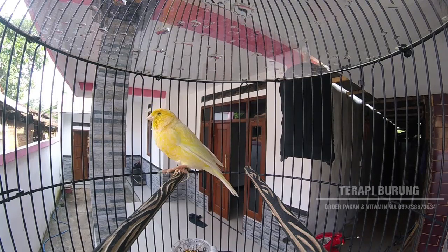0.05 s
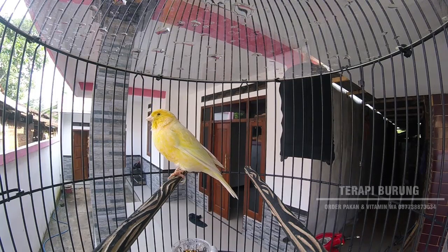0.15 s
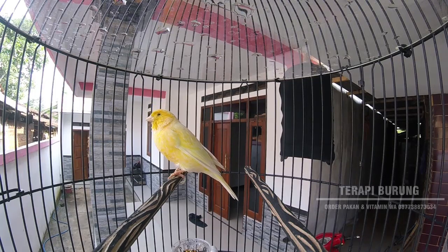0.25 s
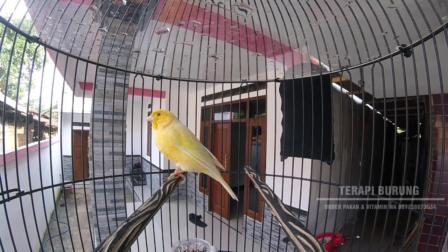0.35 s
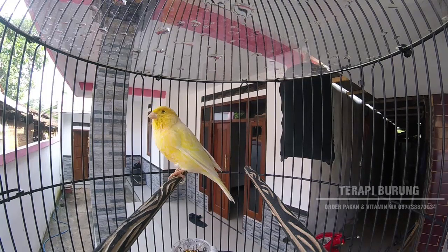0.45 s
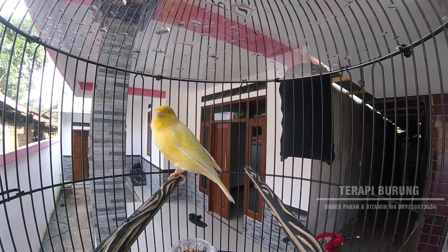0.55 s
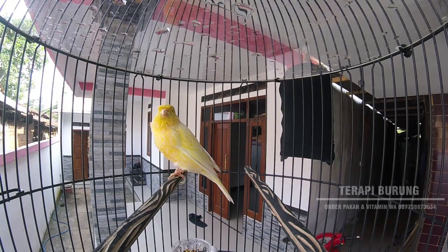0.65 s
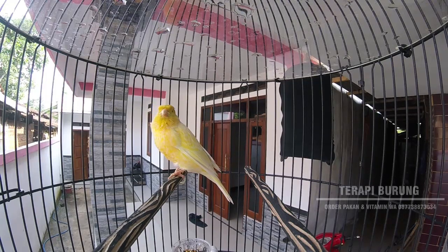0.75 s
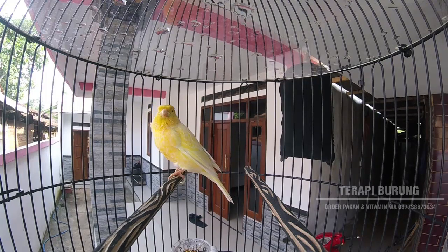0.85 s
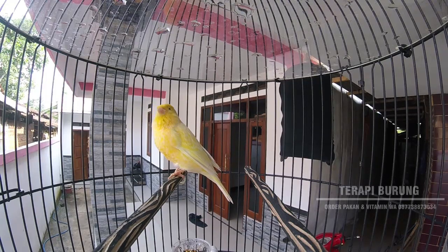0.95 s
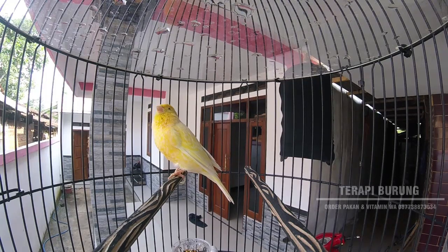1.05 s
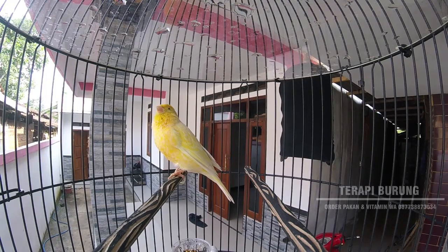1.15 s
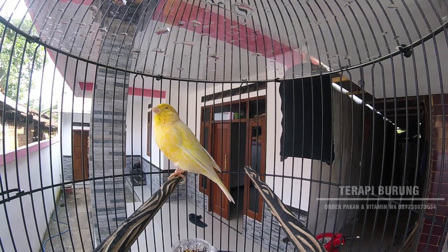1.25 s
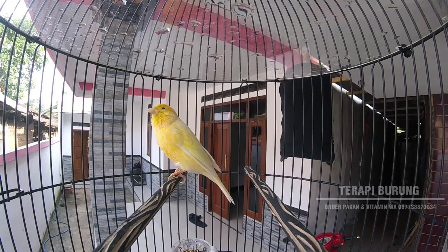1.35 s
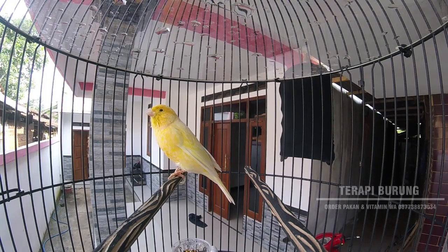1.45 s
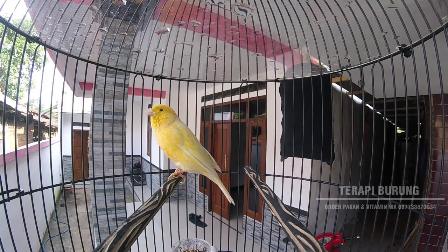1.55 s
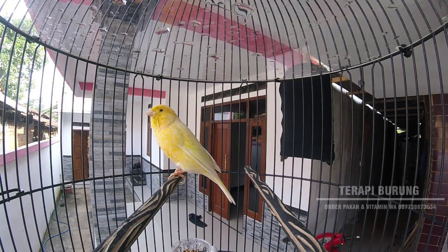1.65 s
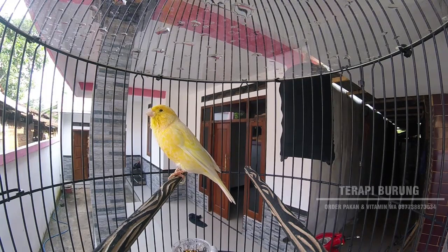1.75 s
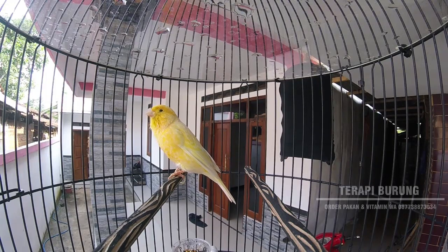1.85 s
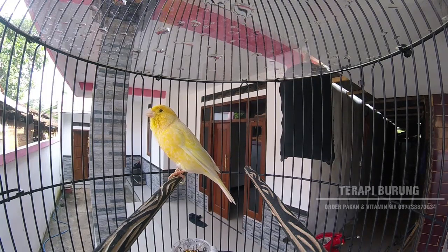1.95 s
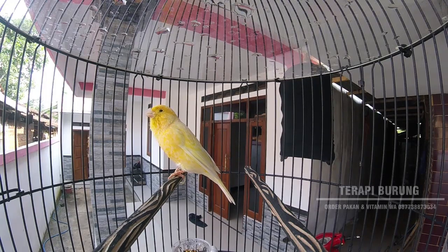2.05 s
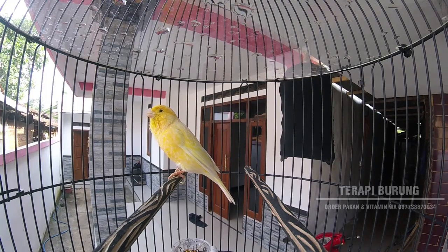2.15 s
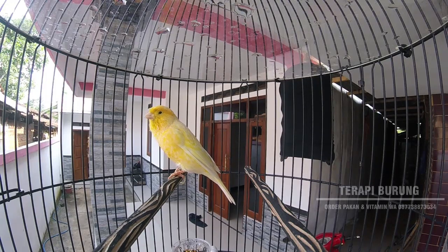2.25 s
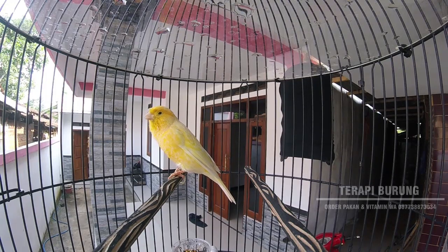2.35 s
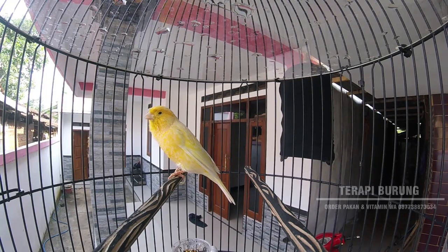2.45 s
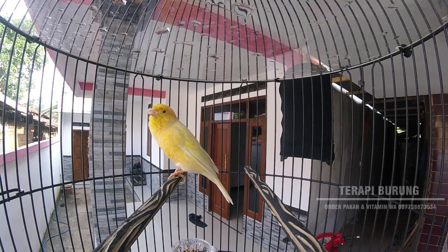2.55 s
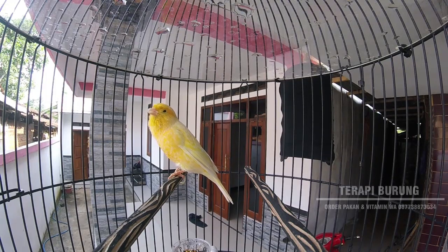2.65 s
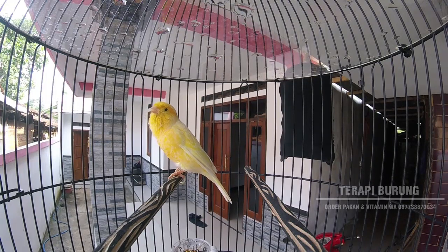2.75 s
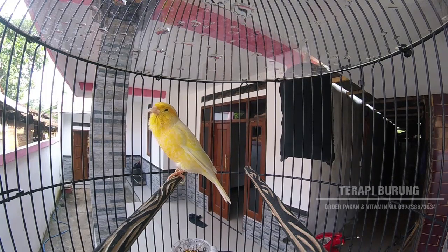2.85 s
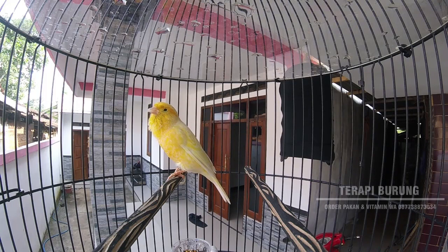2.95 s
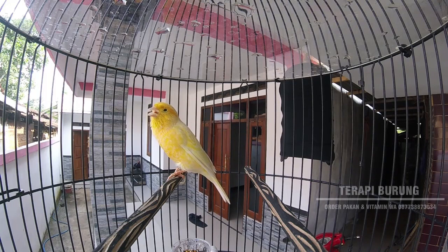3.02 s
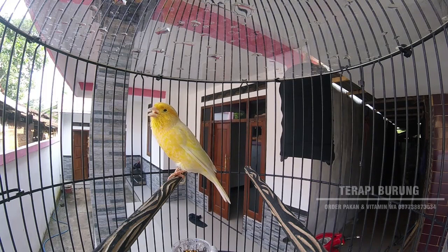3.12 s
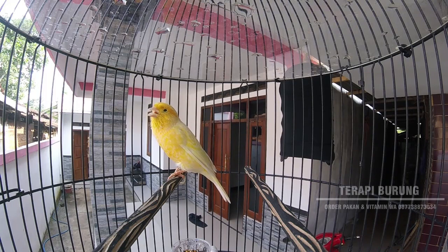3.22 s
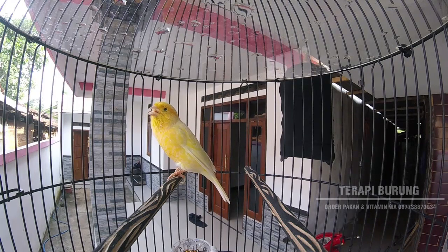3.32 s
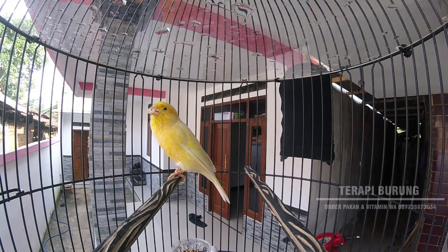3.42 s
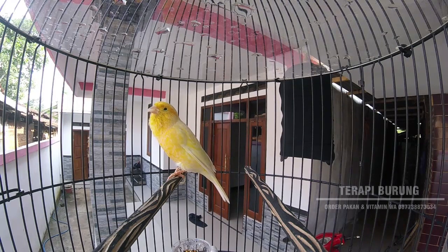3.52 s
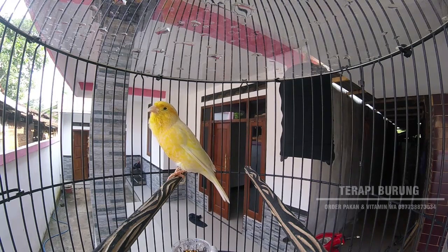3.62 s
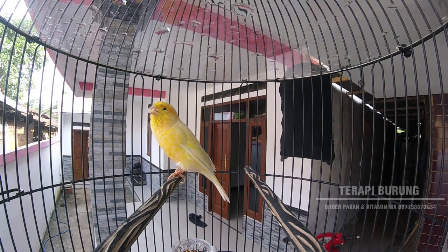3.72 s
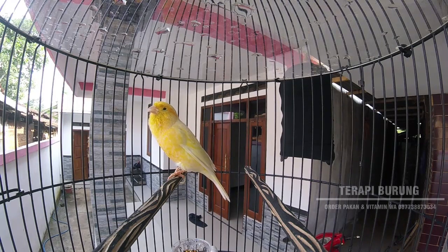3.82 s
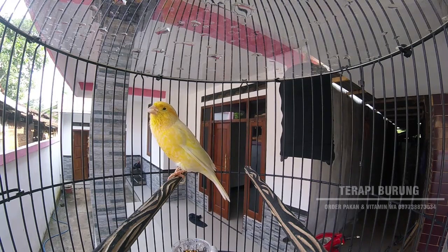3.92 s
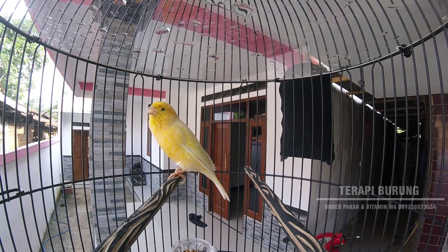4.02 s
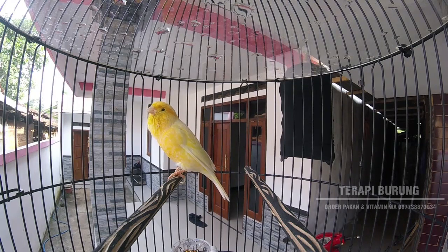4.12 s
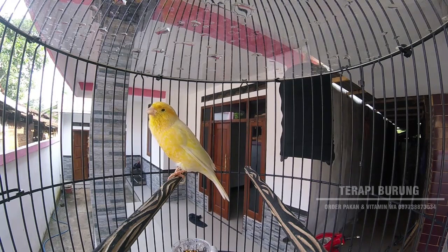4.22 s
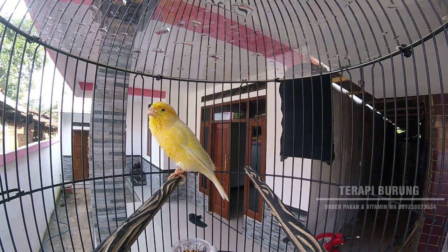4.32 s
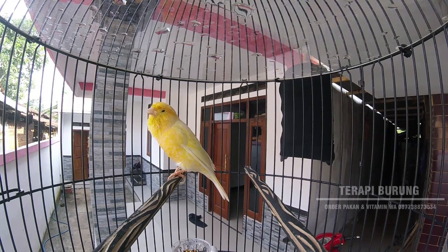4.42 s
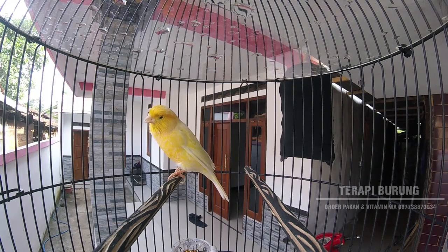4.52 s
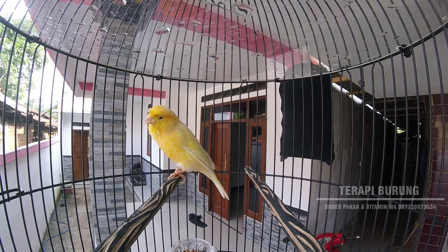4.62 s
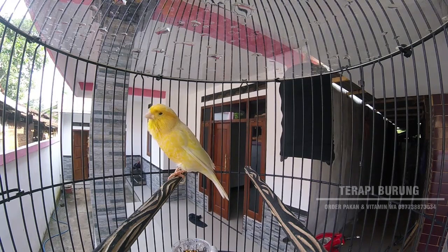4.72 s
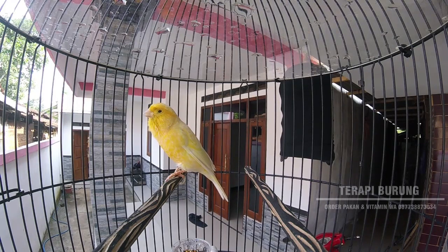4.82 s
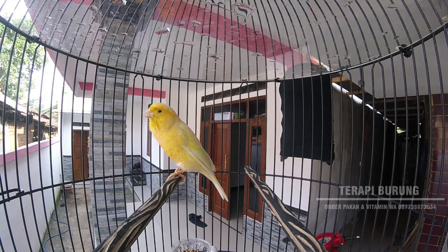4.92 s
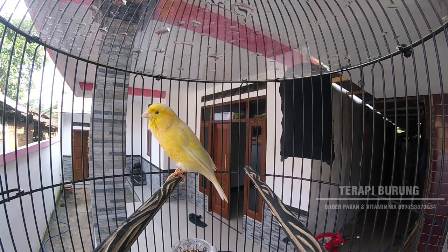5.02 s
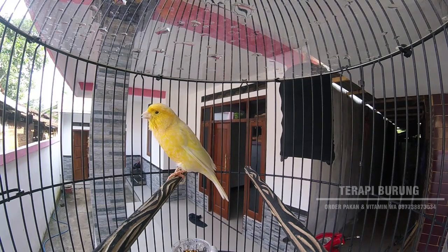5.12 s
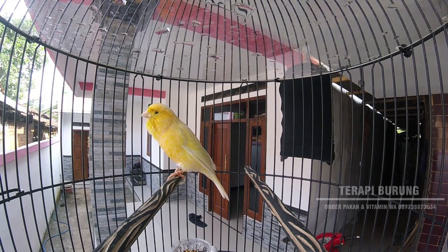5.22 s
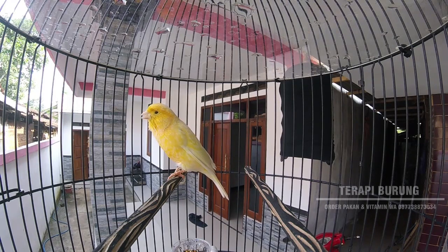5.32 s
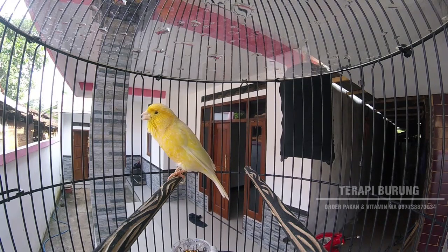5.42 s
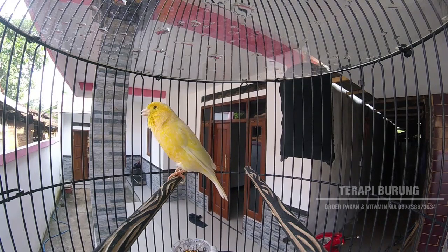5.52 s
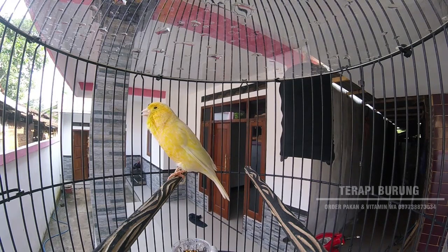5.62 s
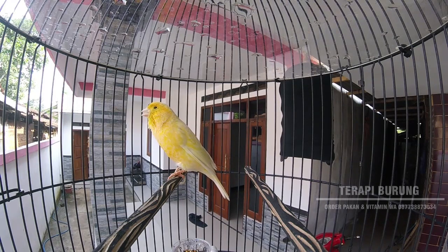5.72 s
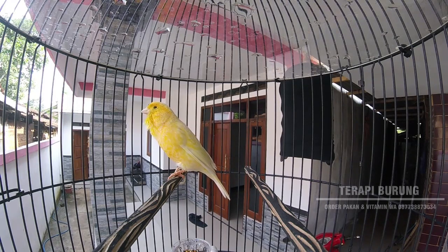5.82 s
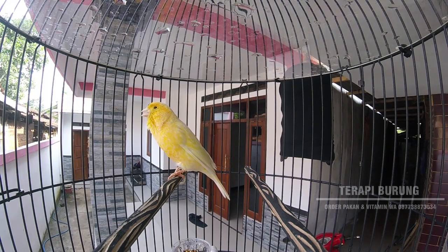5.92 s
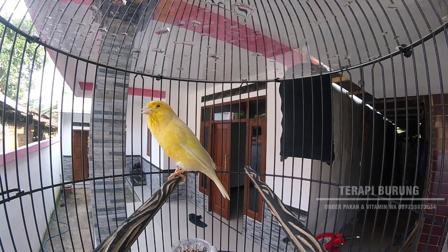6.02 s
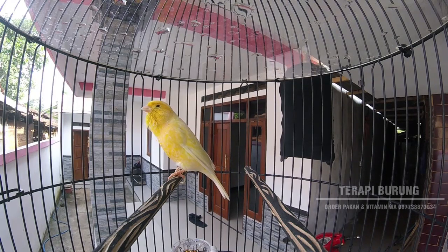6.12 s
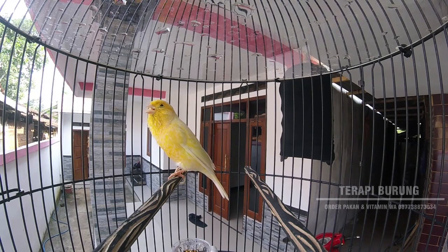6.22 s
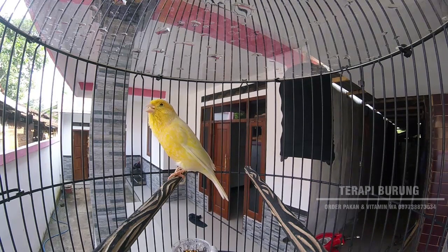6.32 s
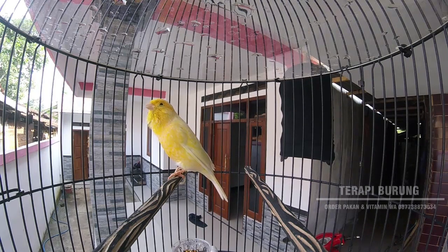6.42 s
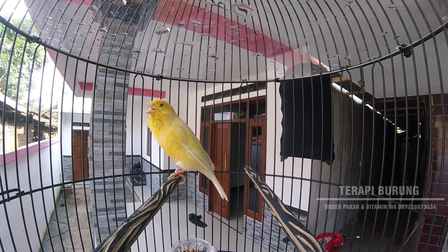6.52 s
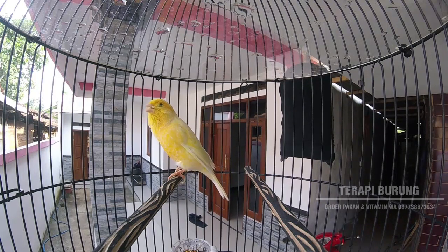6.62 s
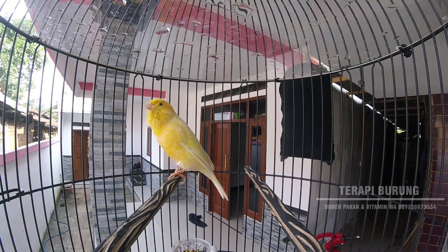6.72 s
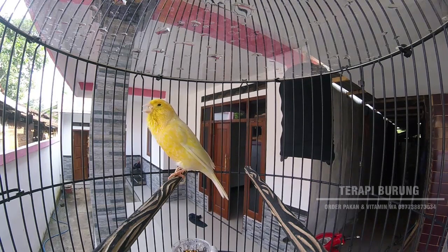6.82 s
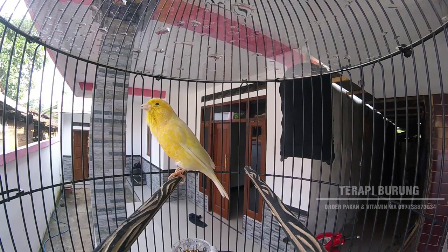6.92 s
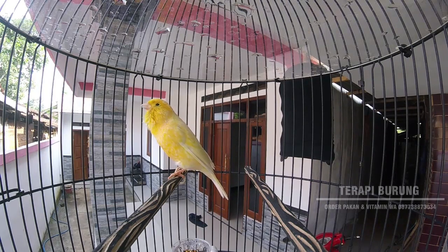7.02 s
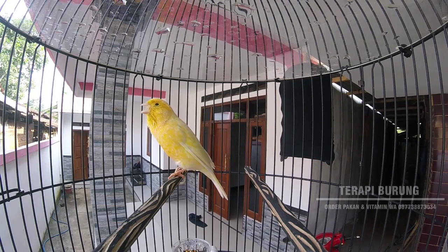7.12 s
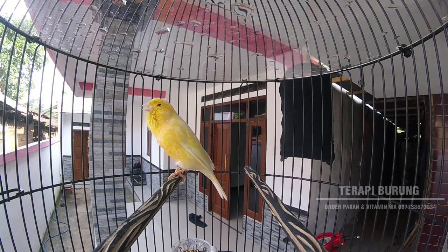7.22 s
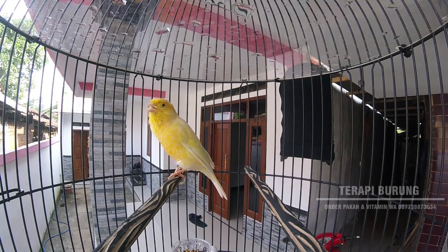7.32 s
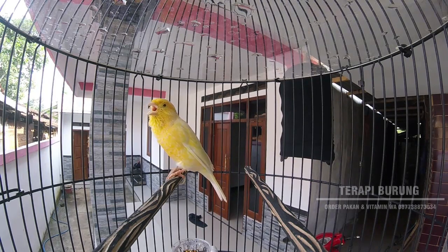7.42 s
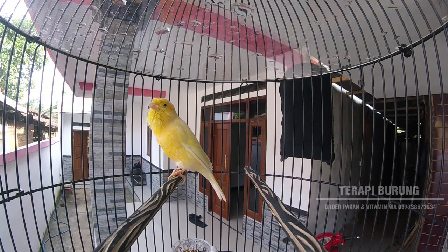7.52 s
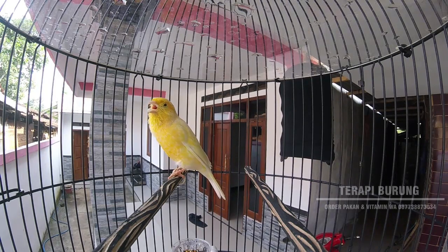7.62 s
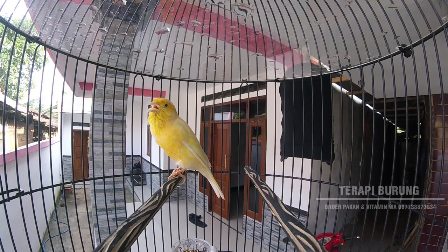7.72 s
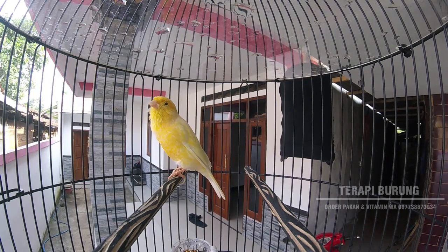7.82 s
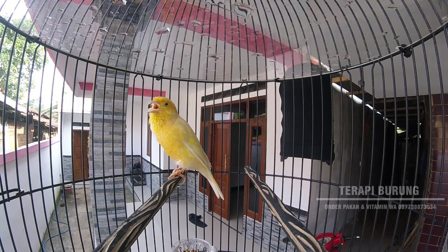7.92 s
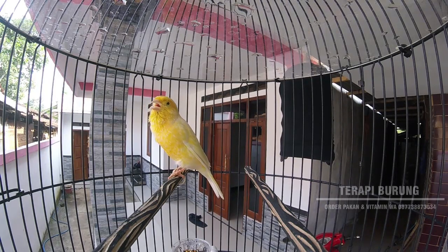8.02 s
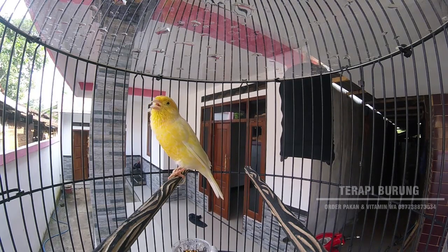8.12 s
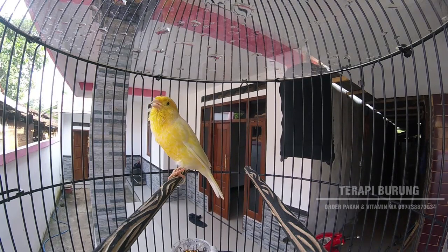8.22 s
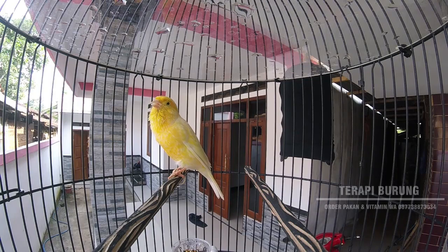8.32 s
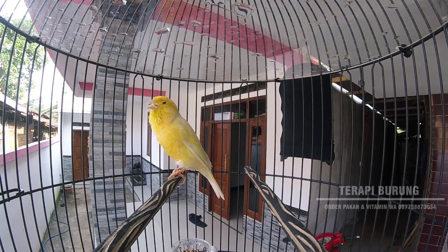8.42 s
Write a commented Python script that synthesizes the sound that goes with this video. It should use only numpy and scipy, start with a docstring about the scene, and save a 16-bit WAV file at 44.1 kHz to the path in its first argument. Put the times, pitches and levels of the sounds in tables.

```python
"""Something heavy trundles briefly in a house amid thuds; insects hiss over a low rumble throughout.
A hoarse bird rasps farther off, then a canary in a wire cage on the porch sings rising glides, then falling
trills that grow loud; thuds return before the final held note. Each whistle is a gliding sine with overtones,
coloured by close reflections and porch echoes; thuds are decaying resonances, the rest shaped noise and a tone."""
import sys
import numpy as np
from scipy import signal
from scipy.fft import rfft, irfft, next_fast_len
from scipy.io import wavfile
from scipy.ndimage import uniform_filter1d

SR = 44100
rng = np.random.default_rng(int(sys.argv[2]) if len(sys.argv) > 2 else 0)


def generate_wav(sig):
    """Save sig (samples, or channels by samples) to the path in sys.argv[1] as 16-bit PCM at SR."""
    pcm = np.round(np.clip(np.atleast_2d(sig).T, -1, 1) * 32767).astype(np.int16)
    wavfile.write(sys.argv[1], SR, pcm)


N = 373086
TIME_S = np.arange(N) / SR

# Trill syllables. Each row: start in seconds, end in seconds, level in dB before the gesture shapes it.
RISE_SYLLABLES = [(1.286, 1.347, -41.5), (1.408, 1.48, -36), (1.527, 1.592, -31), (1.6405, 1.703, -29.5),
                  (1.7495, 1.814, -26.2), (1.8567, 1.9165, -22.9), (1.9606, 2.024, -22),
                  (2.0746, 2.1363, -21), (2.1844, 2.2443, -19.5)]
FLICK_SYLLABLES = [(2.346, 2.342, -27), (2.425, 2.433, -24), (2.528, 2.536, -23), (2.631, 2.639, -24),
                   (2.736, 2.75, -31)]
SWEEP_SYLLABLES = [(2.431, 2.512, -25.5), (2.539, 2.615, -24), (2.646, 2.718, -20.5), (2.748, 2.823, -18),
                   (2.855, 2.928, -20), (2.958, 3.034, -20), (3.0615, 3.141, -19.5), (3.171, 3.242, -20.5),
                   (3.2695, 3.347, -21), (3.374, 3.443, -21), (3.469, 3.53, -21.5)]
ROLL_SYLLABLES = [(3.5623, 3.6114, -23), (3.6403, 3.692, -25), (3.721, 3.7574, -24), (3.7917, 3.8343, -25),
                  (3.8665, 3.904, -26), (3.936, 3.9725, -23), (4.0029, 4.049, -22), (4.0762, 4.1208, -24.0),
                  (4.1485, 4.199, -24), (4.2258, 4.2764, -23.5), (4.3015, 4.3537, -24),
                  (4.3824, 4.427, -25), (4.4563, 4.4987, -23.5), (4.532, 4.58, -24), (4.606, 4.652, -24.5),
                  (4.6771, 4.725, -26.5), (4.749, 4.799, -25), (4.8172, 4.8595, -24.5),
                  (4.8755, 4.9175, -24.5), (4.93, 4.9735, -25), (4.9913, 5.031, -25.5),
                  (5.105, 5.1354, -26)]
SLIDE_SYLLABLES = [(5.205, 5.316, -21), (5.4264, 5.5415, -16.5), (5.622, 5.7337, -16),
                   (5.7833, 5.9085, -17.5)]
WHIP_SYLLABLES = [(6.0952, 6.1991, -10), (6.2486, 6.3468, -10), (6.391, 6.4919, -11),
                  (6.5342, 6.6492, -10.5), (6.6967, 6.804, -10.5), (6.8507, 6.9522, -10.5),
                  (6.9982, 7.1142, -10)]
LONG_WHIP_SYLLABLES = [(7.161, 7.334, -10), (7.389, 7.596, -9.5), (7.657, 7.862, -10)]
# Gestures, as keywords of whistle(): pitches in Hz, levels in dB, plunge in seconds;
# attack and release are shares of the glide; hurry, ease and linger are plain factors.
RISE_GESTURE = dict(from_hz=1240, to_hz=4790, hurry=.72, ease=-0.096, attack=0.33, swell_db=17, release=0.17, fade_db=4, linger=0.72, low_db=-14, dip_db=2)
FLICK_GESTURE = dict(from_hz=3300, to_hz=7330, hurry=0.66, attack=.1, swell_db=0, release=1, fade_db=20)
SWEEP_GESTURE = dict(from_hz=7163, to_hz=2844, hurry=.24, ease=0.204, attack=0.28, swell_db=28.5, release=.05, fade_db=8.5, plunge_s=.004, linger=0.56, low_db=3, dip_db=6)
ROLL_GESTURE = dict(from_hz=7280, to_hz=2761, hurry=.68, ease=0.045, attack=0.26, swell_db=20.5, release=0.3, fade_db=11.5, plunge_s=0.0038, linger=.05, low_db=6, dip_db=5.5)
SLIDE_GESTURE = dict(from_hz=6970, to_hz=2936, hurry=-0.047, attack=0.59, swell_db=22.5, release=0.4, fade_db=14.5, plunge_s=0.00192, linger=.2, low_db=8, dip_db=2)
WHIP_GESTURE = dict(from_hz=5260, to_hz=2460, hurry=-.46, ease=.27, attack=0.51, swell_db=24, release=0.37, fade_db=4.5, plunge_s=0.01, low_db=-5.5, dip_db=-0.5)
LONG_WHIP_GESTURE = dict(from_hz=5630, to_hz=2844, hurry=-0.64, ease=0.21, attack=0.19, swell_db=27, release=0.2, fade_db=4.5, plunge_s=.012, crescendo_db=8.5)
# Notes sung once. Each row: start in seconds, end in seconds, level in dB before shaping, gesture.
SINGLE_NOTES = [ (2.281, 2.336, -21.5, dict(from_hz=1280, to_hz=2235, hurry=6.54, attack=0.6, swell_db=25, release=0.32, fade_db=10)),
                (2.352, 2.41, -29.5, dict(from_hz=6330, to_hz=2720, hurry=0.11, attack=.1, swell_db=10, release=0.12, fade_db=0, plunge_s=0.0041)),
                (5.06, 5.075, -27.5, dict(from_hz=4300, to_hz=3080, attack=0.84, swell_db=7, release=0.24, fade_db=16)),
                (5.379, 5.432, -40.5, dict(from_hz=7160, to_hz=6930, hurry=-1, attack=0.86, swell_db=23, release=.1, fade_db=3)),
                (5.956, 6.052, -13.5, dict(from_hz=7000, to_hz=2596, hurry=0.29, attack=0.5, swell_db=32, release=0.5, fade_db=8, plunge_s=0.015)),
                (7.921, 8.13, -11, dict(from_hz=5900, to_hz=3703, hurry=0.19, ease=.55, attack=0.22, swell_db=22.5, release=0.036, fade_db=4.5, crescendo_db=9)),
                (8.184, 8.203, -18, dict(from_hz=7440, to_hz=3550, attack=0.28, swell_db=9, release=0.81, fade_db=24)),
                (8.207, 8.243, -42, dict(from_hz=3330, to_hz=3260, attack=0.56, swell_db=7, release=0.12, fade_db=2)),
                (8.225, 8.412, -8, dict(from_hz=3290, to_hz=3194, hurry=1.2, attack=0.15, swell_db=22.5, release=0.51, fade_db=10))]
# Overtones against the fundamental, before the effect of loudness. Each row: overtone in Hz, strength in dB.
SECOND_HARMONIC = [(3000, -41), (5000, -58), (6500, -39.5), (8000, -45), (9500, -32.5), (10700, -32.5),
                   (11500, -40), (12500, -86), (15000, -62.5)]
THIRD_HARMONIC = [(5000, -45), (7500, -33.5), (10300, -49.5), (10900, -34.5), (12200, -53), (14000, -41.5),
                  (15000, -67)]
FOURTH_HARMONIC = [(6000, -66), (10000, -67), (12000, -66), (13500, -58.5), (15000, -75.5)]
# Peaks and dips from surfaces close to the bird. Each row: centre in Hz, width in Hz, gain in dB.
CAGE_REFLECTIONS = [(2404, 85, 9), (2610, 131, -11.5), (3240, 160, -1.4), (3510, 158, 10),
                    (3637, 221, -9.5), (4042, 147, 5), (4700, 201.2, 3.5), (4660, 166, -7),
                    (5194, 354, -11.5), (5650, 190, 6), (5960, 140, -8), (6270, 224, 11)]
# Colour of the porch echoes. Each row: frequency in Hz, gain in dB.
PORCH_COLOUR = [(700, -3), (1500, -3), (2600, -1.5), (3300, 0.5), (4100, 3.5), (5500, 4.5), (7000, 9.5),
                (9000, -1.5), (11000, 8.5), (15000, 5.5)]
# Hoarse calls farther off. Each row: start in seconds, end in seconds, rasp level in dB, pitch in Hz,
# level of the pitch against the rasp in dB.
RASP_CALLS = [(0.59, .88, -52, 5700, -6), (2.722, 2.874, -38.5, 3700, -4), (4.703, 4.852, -37.5, 2500, -5),
              (5.477, 5.796, -43, 2280, -8)]
# Thuds. Each row: start in seconds, level in dB, brightness in Hz, base T60 in seconds.
THUD_BLOWS = [(0.07, -32.5, 1100, 0.59), (0.137, -29.5, 1400, 0.46), (1.33, -50.5, 310, 1.2),
              (7.13, -42, 750, 1.1), (7.175, -40.5, 245, 0.69), (7.498, -41, 570, 0.75)]
# House resonances. Each row: frequency in Hz, noise half-width in Hz, level in dB, factor on the base T60.
HOUSE_MODES = [(64.2, 25, -1, 2.37), (110, 43, -6.5, 3.1), (158.4, 11, -6.5, 1.57), (192, 6.7, -7, 0.92),
               (278.5, 49, -9.5, 1.4), (331, 12, -13.5, 1.8), (378, 7.9, -9, 0.49), (498, 120, -16.5, 3),
               (543, 3.8, -7, 0.48), (620, 91, -6.5, 0.37), (680, 22, -6.5, 1.1), (1004, 280, -11, 0.47),
               (454, 70, -18.5, 1.2)]
# Trundling in the house. Each row: time in seconds, level in dB.
TRUNDLE_LEVEL = [(0, -42), (.06, -48), (.12, -40), (.3, -48), (.5, -49), (.54, -75)]
# Insect chorus. Each row: time in seconds, level in dB.
INSECT_LEVEL_CURVE = [(0, -49), (.7, -47), (1.3, -47), (2.3, -47), (4, -48), (5.2, -49), (6, -49.5),
                      (7.5, -59.5), (8.46, -51)]
# Noise spectra, relative. Each row: frequency in Hz, density in dB per Hz.
INSECT_SPECTRUM = [(3000, -22), (4100, -17.5), (4500, -3.5), (4800, 5.5), (5150, -1.5), (5600, -12.5),
                   (6100, -13), (6550, -13.5), (7200, -22.5), (9000, -25), (10500, -37.5), (12500, -35),
                   (15000, -64)]
RASP_SPECTRUM = [(1000, -24), (1900, -33), (2300, -20), (2650, 6.5), (3300, 10), (4500, 8), (5600, 13),
                 (6700, 12), (7500, -4), (9000, -5), (11000, -37), (14000, -46)]
AIR_SPECTRUM = [(15, -45.5), (25, -8.5), (42, 3.5), (59, 6), (73, 2), (86, -1), (124, -6), (573, -27),
                (753, -47.5), (819, -23.5), (891, -29), (1270, -27.5), (2440, -22), (3800, -24.5),
                (4940, -69), (8360, -120)]
WASH_SPECTRUM = [(60, -16), (150, -1), (300, -1), (550, 0), (1100, -0.5), (2000, -7), (4000, -27.5)]
# Swells of far-off activity. Each row: centre in seconds, length in seconds, level in dB.
WASH_SWELL_ROWS = [(0, 0.95, -78), (2.48, .35, -62), (4.12, 0.11, -64), (4.43, 0.18, -64.5),
                   (5.65, 1.4, -63), (8.2, 3.6, -65.5)]
# Distant motor whine. Each row: time in seconds, level in dB.
WHINE_LEVEL_CURVE = [(0, -70.5), (2.7, -71), (3.2, -82), (5.4, -77), (6.5, -75.5), (8.46, -73.5)]
# Thin steady tones. Each row: frequency in Hz, half-width in Hz, level in dB.
THIN_TONES = [(58.3, 12, -57.5), (5250, 9.2, -59.5)]

BREAK_HZ, BREAK_WIDTH_HZ, LOWEST_HZ = 3250, 233, 770  # register break; lowest pitch
PLUNGE_HZ_PER_S, PLUNGE_DB_PER_S = 173000, 2097
SHUT_S, FLUTTER_DB = 0.003, 1.5
EARLY_T60_S, EARLY_DB = 0.027, -17.5  # levels before PORCH_COLOUR
PORCH_T60_S, PORCH_DB = 0.4, -21
AIR_DB, WASH_DB, WHINE_HZ = -54.5, -68, 745
CUTOFF_HZ = 14800


def from_db(db):
    """Decibels to gain."""
    return 10 ** (np.asarray(db) / 20)


def at_hz(points, hz):
    """Gain of a (Hz, dB) table, joined on a log-frequency axis."""
    table_hz, db = np.transpose(points)
    return from_db(np.interp(np.log(np.maximum(hz, 1)), np.log(table_hz), db))


def db_over_time(points):
    """Level in dB over the scene, joined between (s, dB) points."""
    return np.interp(TIME_S, *np.transpose(points))


def noise(gain_at):
    """Noise of rms 1 whose spectrum follows a function of frequency."""
    size = next_fast_len(N)
    spectrum = rfft(rng.standard_normal(size))
    x = irfft(spectrum * gain_at(np.fft.rfftfreq(size, 1 / SR)), size)[:N]
    return x / np.std(x)


def resonant_noise(hz, half_width_hz):
    """Noise of rms 1 in one resonance."""
    return noise(lambda f: 1 / (1 + ((f - hz) / half_width_hz) ** 2))


def waver(count, rate_hz):
    """Random values of spread 1 at rate_hz, joined by straight lines."""
    knots = np.arange(count) * rate_hz / SR
    size = int(knots[-1]) + 2
    return np.interp(knots, np.arange(size), rng.standard_normal(size))


def decay_by_60_db(age_s, t60_s):
    """Exponential decay, 60 dB down after t60_s."""
    return np.exp(-np.log(1000) * age_s / t60_s)


def add(track, start_s, sound):
    """Mix a sound into the track."""
    i = int(round(start_s * SR))
    track[i:i + len(sound)] += sound[:max(N - i, 0)]


def canary():
    """The whole song: trills, with single notes between and after them."""
    song = trill(RISE_GESTURE, RISE_SYLLABLES)
    song += trill(FLICK_GESTURE, FLICK_SYLLABLES)
    song += trill(SWEEP_GESTURE, SWEEP_SYLLABLES)
    song += trill(ROLL_GESTURE, ROLL_SYLLABLES)
    song += trill(SLIDE_GESTURE, SLIDE_SYLLABLES)
    song += trill(WHIP_GESTURE, WHIP_SYLLABLES)
    song += trill(LONG_WHIP_GESTURE, LONG_WHIP_SYLLABLES)
    for start_s, end_s, level_db, gesture in SINGLE_NOTES:
        song += trill(gesture, [(start_s, end_s, level_db)])
    return song


def trill(gesture, syllables):
    """One gesture repeated, stretched to the length of each syllable."""
    out = np.zeros(N)
    for start_s, end_s, level_db in syllables:
        hz, shape_db = whistle(end_s - start_s, **gesture)
        add(out, start_s, syrinx(hz, shape_db + level_db))
    return out


def whistle(length_s, from_hz, to_hz, attack, swell_db, release, fade_db, hurry=0, ease=0,
            plunge_s=0, crescendo_db=0, linger=0, dip_db=0, low_db=0):
    """Pitch and level of one syllable: a glide that swells, fades, may plunge, and may catch at the register break."""
    t = np.arange(max(int(length_s * SR), 2)) / SR
    glide_s = max(length_s - plunge_s, 1 / SR)
    share = np.minimum(t / glide_s, 1)
    plunging_s = np.maximum(t - glide_s, 0)
    # Positive hurry runs ahead; positive ease slows both ends.
    way = share + hurry * share * (1 - share) - ease * np.sin(2 * np.pi * share) / (2 * np.pi)
    hz = from_hz + (to_hz - from_hz) * way

    from_break = (hz - BREAK_HZ) / BREAK_WIDTH_HZ
    at_break = np.exp(-from_break ** 2)
    below_break = 0.5 - 0.5 * np.tanh(from_break)
    hz = hz - linger * at_break * (hz - BREAK_HZ)
    hz = np.maximum(hz - PLUNGE_HZ_PER_S * plunging_s, LOWEST_HZ)

    db = -swell_db * np.maximum(1 - share / attack, 0)
    db -= fade_db * np.maximum(1 - (1 - share) / release, 0)
    db -= crescendo_db * (1 - share)
    db += low_db * below_break - dip_db * at_break
    db -= PLUNGE_DB_PER_S * plunging_s
    return uniform_filter1d(hz, size=110, mode="nearest"), db


def syrinx(hz, level_db, jitter=0.0029, attack_s=0.0028, brass=0.29, loud_db=-13, fast_glide_hz_per_s=40000):
    """A nearly pure tone; louder notes strengthen harmonics 3 and 4 and slightly weaken harmonic 2."""
    count = len(hz)
    # Faster glides are less steady.
    unsteady = np.clip(np.abs(np.gradient(hz)) * SR / fast_glide_hz_per_s, 0.12, 1)
    hz = hz * (1 + jitter * unsteady * waver(count, rate_hz=120))
    phase = 2 * np.pi * np.cumsum(hz) / SR
    tone = np.sin(phase)
    for k, strength in enumerate((SECOND_HARMONIC, THIRD_HARMONIC, FOURTH_HARMONIC), 2):
        effort = from_db(brass * (k - 2.5) * (np.max(level_db) - loud_db))
        below_nyquist = k * hz < SR / 2
        tone += effort * at_hz(strength, k * hz) * below_nyquist * np.sin(k * phase)
    t = np.arange(count) / SR
    opening = np.clip(np.minimum(t / attack_s, (t[-1] - t) / SHUT_S), 0, 1)
    gate = np.sin(np.pi / 2 * opening) ** 2
    flutter_db = FLUTTER_DB * unsteady * waver(count, rate_hz=175.6)
    return tone * gate * from_db(level_db + flutter_db)


def cage(x):
    """Close reflections lift some pitches and cancel others, so glides throb as they cross them."""
    for hz, width_hz, db in CAGE_REFLECTIONS:
        half_gain = from_db(db / 2)
        damping = np.pi * width_hz / SR
        turn = -2 * np.cos(2 * np.pi * hz / SR)
        zeros = [1 + damping * half_gain, turn, 1 - damping * half_gain]
        poles = [1 + damping / half_gain, turn, 1 - damping / half_gain]
        x = signal.lfilter(zeros, poles, x + 1e-18)  # offset avoids denormals
    return x


def porch(x, first_echo_s=0.0054):
    """Quick echoes off the roof and walls, then a faint diffuse tail, as decaying noise."""
    t = np.arange(SR) / SR
    response = np.zeros(SR)
    for level_db, t60_s in ((EARLY_DB, EARLY_T60_S), (PORCH_DB, PORCH_T60_S)):
        echoes = rng.standard_normal(SR) * decay_by_60_db(t, t60_s) * (t > first_echo_s)
        response += from_db(level_db) * echoes / np.linalg.norm(echoes)
    response = irfft(rfft(response) * at_hz(PORCH_COLOUR, np.fft.rfftfreq(SR, 1 / SR)), SR)
    return signal.fftconvolve(x, response[:SR * 3 // 4])[:N]


def rasps():
    """Each hoarse call swells and fades: a broad rasp around a blurred pitch."""
    out = np.zeros(N)
    hiss = noise(lambda f: at_hz(RASP_SPECTRUM, f))
    for start_s, end_s, level_db, hz, pitch_db in RASP_CALLS:
        swell = np.sin(np.pi * np.clip((TIME_S - start_s) / (end_s - start_s), 0, 1))
        pitch = from_db(pitch_db) * resonant_noise(hz, half_width_hz=180)
        out += from_db(level_db) * swell * (hiss + pitch)
    return out


def knocks(knock_db=-2, knock_t60_s=0.19):
    """The contact that starts each thud: a short burst of low-passed noise."""
    out, age_s = np.zeros(N), TIME_S[:SR // 4]
    for start_s, level_db, bright_hz, _ in THUD_BLOWS:
        lowpass = signal.butter(3, 0.5 * bright_hz, fs=SR, output="sos")
        burst = signal.sosfilt(lowpass, rng.standard_normal(len(age_s)))
        burst *= decay_by_60_db(age_s, knock_t60_s) / np.std(burst)
        add(out, start_s, from_db(level_db + knock_db) * burst)
    return out


def house(attack_s=0.0009, trundle_hz=700, rattle_db=-5):
    """Blows set house resonances ringing and rattling; trundling drives the same resonances as noise."""
    out, age_s = np.zeros(N), TIME_S[:2 * SR]
    rolling = from_db(db_over_time(TRUNDLE_LEVEL))
    for hz, half_width_hz, mode_db, t60_factor in HOUSE_MODES:
        noise_power = (rolling / (1 + (hz / trundle_hz) ** 4)) ** 2
        for start_s, level_db, bright_hz, t60_s in THUD_BLOWS:
            height = from_db(level_db) / (1 + (hz / bright_hz) ** 4)
            onset = np.minimum(age_s / attack_s, 1)
            envelope = height * onset * decay_by_60_db(age_s, t60_s * t60_factor)
            ring = np.sin(2 * np.pi * (hz * age_s + rng.random()))
            add(out, start_s, from_db(mode_db) * envelope * ring)
            add(noise_power, start_s, (from_db(rattle_db) * envelope) ** 2)
        out += from_db(mode_db) * np.sqrt(noise_power) * resonant_noise(hz, half_width_hz)
    return out


def insects(shimmer_db=0.8):
    """A chorus heard as shaped hiss with a fast, slight shimmer."""
    level_db = db_over_time(INSECT_LEVEL_CURVE) + shimmer_db * waver(N, rate_hz=93)
    return from_db(level_db) * noise(lambda f: at_hz(INSECT_SPECTRUM, f))


def air():
    """Steady noise, mostly low rumble."""
    return from_db(AIR_DB) * noise(lambda f: at_hz(AIR_SPECTRUM, f))


def wash():
    """Far-off activity: noise at a resting level with triangular swells."""
    level = np.full(N, from_db(WASH_DB))
    for centre_s, length_s, db in WASH_SWELL_ROWS:
        level += from_db(db) * np.maximum(1 - 2 * np.abs(TIME_S - centre_s) / length_s, 0)
    return level * noise(lambda f: at_hz(WASH_SPECTRUM, f))


def whine():
    """A distant motor: one sine of varying level."""
    sine = np.sqrt(2) * np.sin(2 * np.pi * WHINE_HZ * TIME_S)  # rms 1
    return from_db(db_over_time(WHINE_LEVEL_CURVE)) * sine


def thin_tones():
    """Steady tones as narrow resonant noise."""
    return sum(from_db(db) * resonant_noise(hz, half_width_hz) for hz, half_width_hz, db in THIN_TONES)


def scene():
    """The bird close by, its echoes, and the surroundings."""
    song = canary()
    bird = cage(song) + porch(song)
    outdoors = insects() + air() + wash() + whine() + thin_tones()
    return (bird + rasps() + knocks() + house() + outdoors)[None]


def record(dry):
    """Steep elliptic low-pass at the top of the band."""
    return signal.sosfilt(signal.ellip(10, 0.1, 80, CUTOFF_HZ, fs=SR, output="sos"), dry)


dry = scene()
out = record(dry)
generate_wav(out)
```